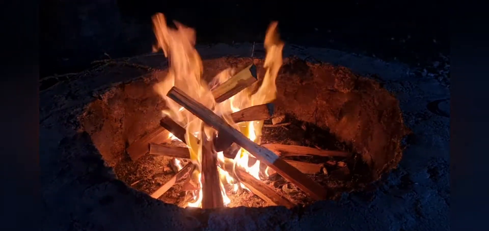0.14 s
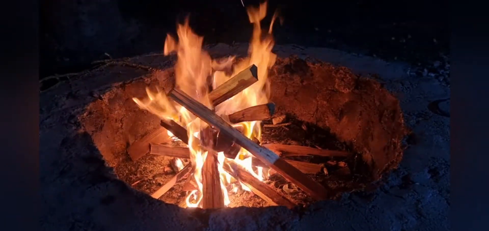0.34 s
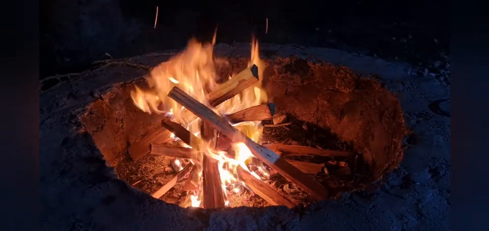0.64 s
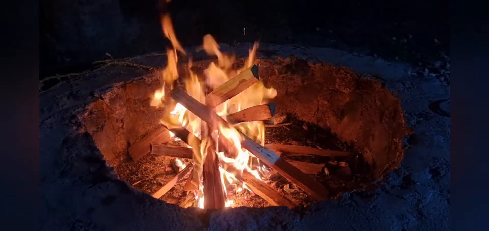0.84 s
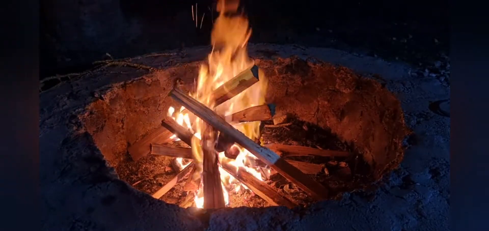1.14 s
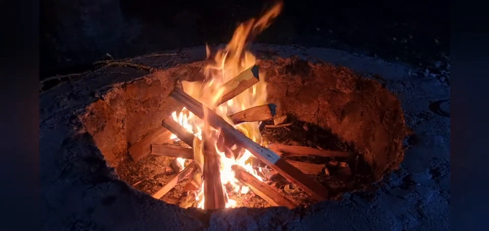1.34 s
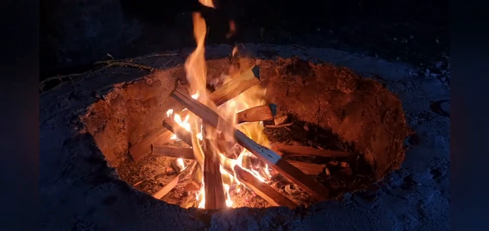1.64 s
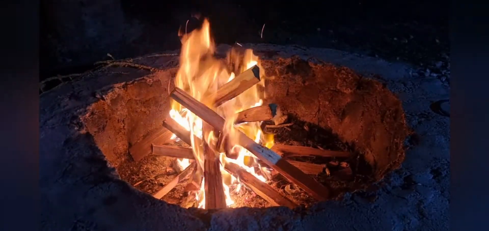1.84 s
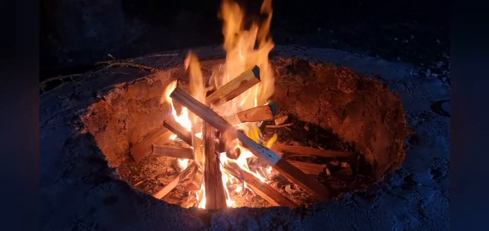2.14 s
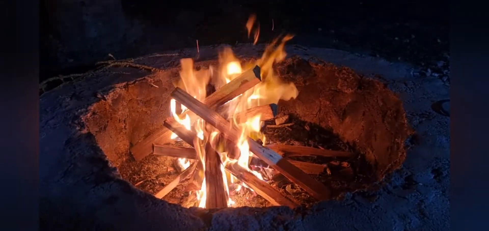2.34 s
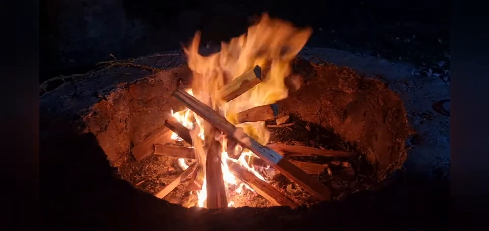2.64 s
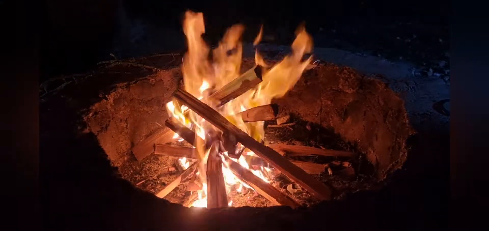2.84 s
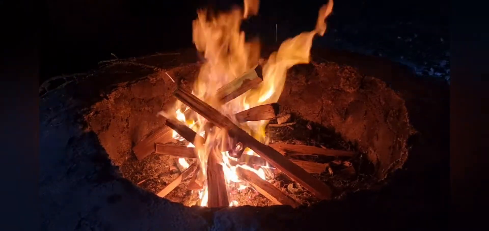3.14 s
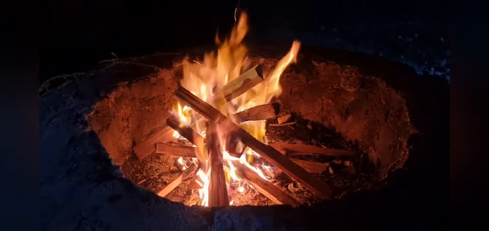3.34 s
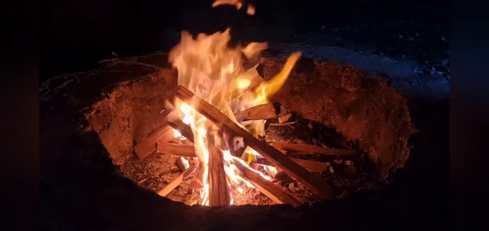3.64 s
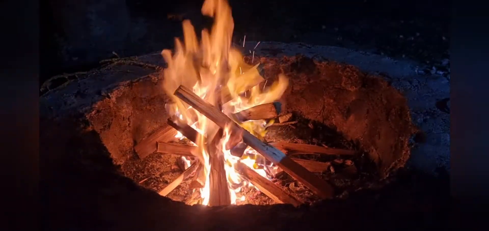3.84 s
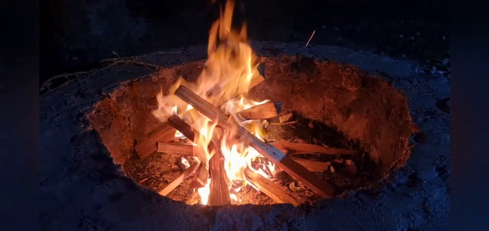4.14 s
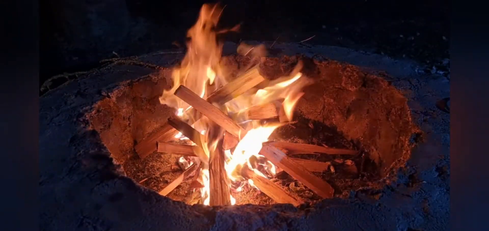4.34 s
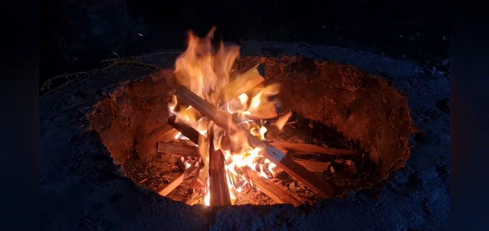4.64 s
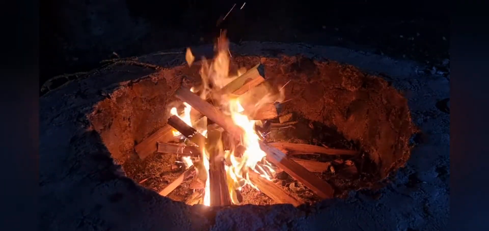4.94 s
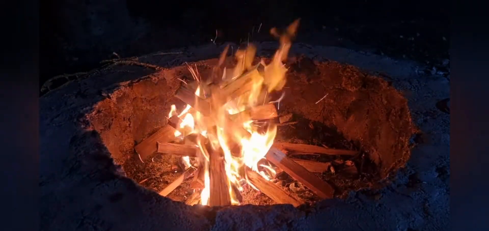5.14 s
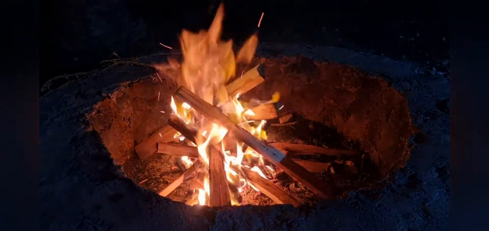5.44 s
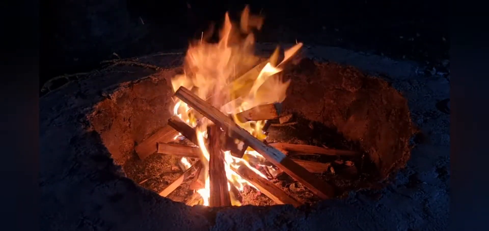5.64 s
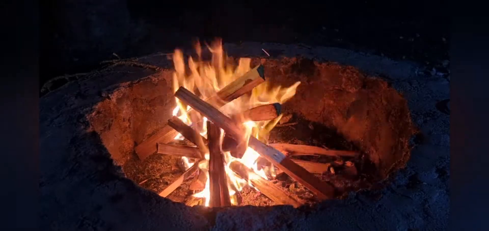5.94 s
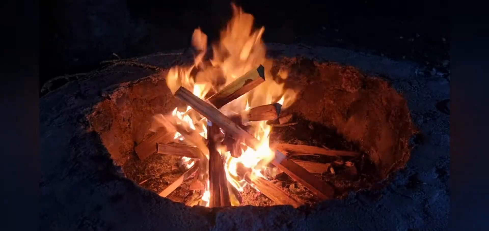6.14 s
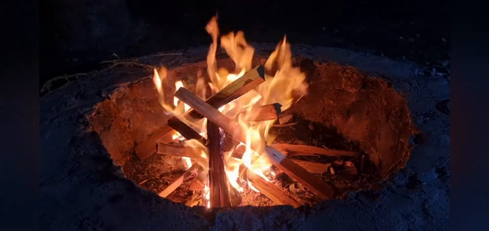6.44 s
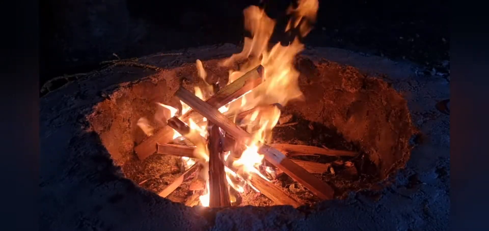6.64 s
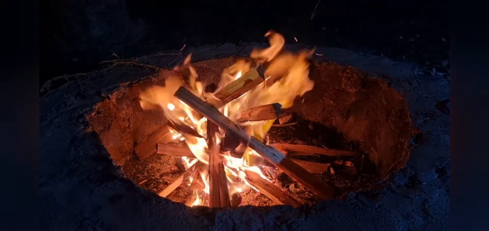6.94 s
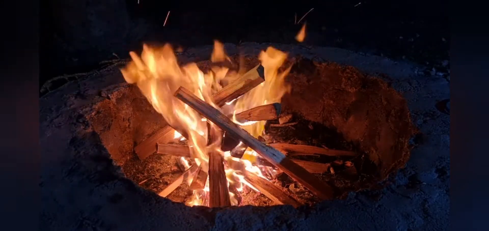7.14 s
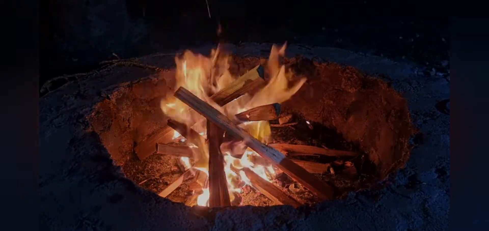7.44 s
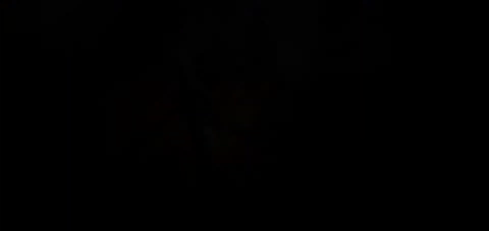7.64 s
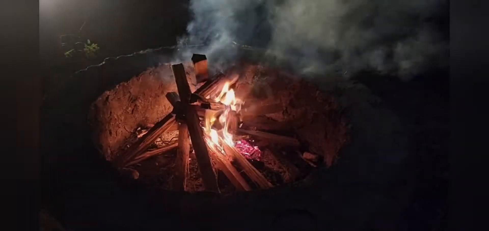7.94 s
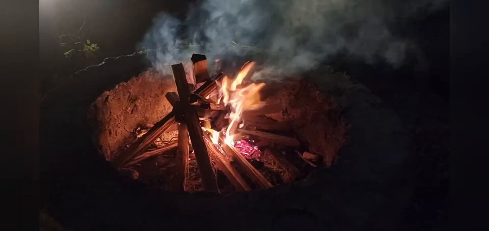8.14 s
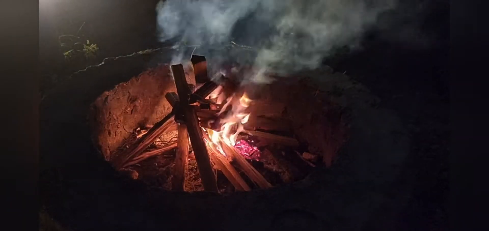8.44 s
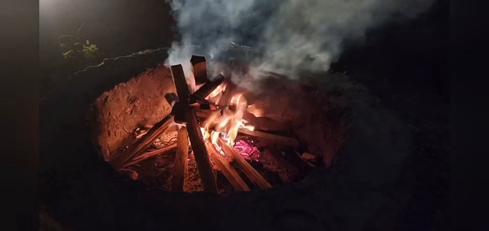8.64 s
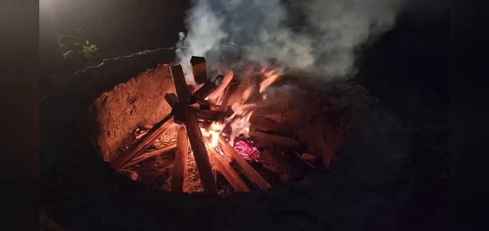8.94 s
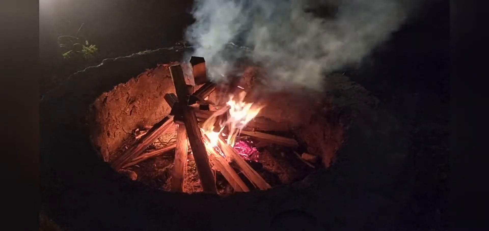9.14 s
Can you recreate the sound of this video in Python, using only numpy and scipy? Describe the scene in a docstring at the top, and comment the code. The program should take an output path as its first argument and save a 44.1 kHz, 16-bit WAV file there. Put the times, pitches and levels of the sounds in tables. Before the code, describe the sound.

Logs burn in an open pit: unsteady low rumble with short swells, faint high hiss, tiny random crackles, brittle woody snaps and brief crumbling charcoal. Bright insects trill and rasp continuously all round, leaning slightly left, over faint open air and a distant low hum. The pit wall gives the pops a very short echo. Late on, the whole sound fades down and up again; the fire is lower, with a few last pops.

```python
"""Flames flutter and rumble in an earthen pit at night, steam hisses from the wood, insects sing all round.
Flames, steam and open air are shaped noise; a wavering sine hums low. Crickets and katydids are noise bands
pulsed by wing strokes, and lone insects are thin wavering tones. Sap pockets pop and charcoal crumbles:
ringing noise bursts, the pops with damped modes added, all echoed by the pit wall.
The sound fades out and in again on the same fire burning lower, with other insects leading."""
import sys
import numpy as np
from scipy import signal
from scipy.fft import rfft, irfft, next_fast_len
from scipy.io import wavfile
from scipy.ndimage import uniform_filter1d, map_coordinates

SR = 44100
rng = np.random.default_rng(int(sys.argv[2]) if len(sys.argv) > 2 else 0)


def unload_wav(signal):
    """Save mono or channel-first audio to the path in sys.argv[1] as 16-bit WAV at rate SR, clipped to [-1, 1]."""
    wavfile.write(
        sys.argv[1],
        SR,
        np.round(np.clip(np.atleast_2d(signal).T, -1, 1) * 32767).astype(np.int16),
    )


N = 410130

# Rumble of the full fire, before flares: (time [s], level [dB])
DRAUGHT_DB = [(0, -52), (1.3, -49), (3.5, -46), (4.5, -51), (5.5, -47), (6.3, -53), (7.2, -51)]
# Flames flaring up: (time [s], length [s], rumble change [dB], flutter change [dB])
FLARES = [(2.21, 0.11, 6, 1.5), (5.083, .2, 5.5, 0), (5.344, 0.021, 0, 11), (5.82, 0.23, 7.5, -0.5)]
# Relative spectrum of the flames: (frequency [Hz], density [dB per Hz])
FLAME_SPECTRUM = [(13, -28), (22, -17), (54, -3), (75, 0), (173, -7), (258, -25.5), (400, -38), (520, -69),
                  (880, -120)]
# Relative spectrum of the steam: (frequency [Hz], density [dB per Hz])
STEAM_SPECTRUM = [(8000, -34), (10000, -15), (11200, -2.5), (12400, 5), (15600, 6), (16000, -4)]
# Insect choirs; the crickets sing lower than the katydids: (song [Hz], width scale [Hz],
# wing strokes [1/s], stroke depth [-], level before the fade's low point [dB], level after it [dB],
# left-right [dB])
CRICKETS = [(2681, 81, 11, 0.3, -58, -58, -4), (2357, 340, 20, 0.4, -62, -62.5, 0)]
# Same columns; the last two rows also take the swell
KATYDIDS = [(4140, 258, 29, 0.14, -53.5, -51, -5), (4810, 750, 100, 0.35, -59.5, -52.5, -7.5),
            (5294, 530, 69, 0.13, -50, -47.5, -3.5), (6694, 890, 23, 0.22, -47.5, -50.5, -3.5),
            (7450, 1230, 99, 0.29, -50.5, -53.5, 0)]
# Swell of the two highest katydid choirs: (time [s], gain [dB])
SWELL_DB = [(0, -.5), (1.5, 0), (3, 1), (4.5, 1), (5.5, 2.5), (6.7, 2), (7.3, 0.5), (9.3, 2)]
# Lone insects holding one thin note: (frequency [Hz], relative level [dB])
WHINES = [(4412, -66.5), (4485, -63), (7130, -76), (7950, -70.5)]
# Relative spectrum of the open air: (frequency [Hz], density [dB per Hz])
AIR_SPECTRUM = [(150, 7), (300, 0.5), (550, 3), (830, -5.5), (1050, -2), (1400, -7), (1600, -4.5),
                (1900, -8.5), (3100, -2.5), (3500, 1.5), (8500, -1), (10000, -5.5), (16000, -24)]
# Bursting sap pockets: (time [s], thud [dB], knock [dB], snap [dB], spit [dB], knock [Hz], snap [Hz],
# base t60 [s], left-right [dB]); noise bursts scale the base t60, damped modes have fixed decays
POPS = [(0.5416, -43.5, -37, -45, -60, 1370, 3270, 0.011, -1.5),
        (0.811, -39, -35.5, -24.5, -23.5, 1870, 4560, 0.0073, -4.5),
        (0.989, -50, -44.5, -39.5, -39, 1590, 4800, .013, 0),
        (2.086, -65, -58, -50, -40, 2090, 6240, .01, 13),
        (2.295, -45.5, -33, -29.5, -40, 1850, 6740, 0.0067, -2.5),
        (2.6317, -67, -58, -46, -42.5, 1690, 6500, 0.022, -4),
        (3.5175, -51, -40, -31, -41, 1160, 4760, 0.019, -1),
        (3.5554, -36, -34.5, -21, -22.5, 2000, 4170, .008, -6),
        (3.57, -52, -56, -36, -31.5, 1420, 3340, .09, -18.5),
        (3.589, -63, -58, -39, -41, 1370, 6300, .027, 4),
        (5.7415, -60, -56, -40.5, -38, 1480, 4300, .016, 2),
        (6.6353, -54, -31, -28, -39, 1330, 3570, .0065, -1.5),
        (6.969, -61, -57, -49, -38, 1980, 5470, .016, -1.5),
        (6.992, -58, -64, -41, -37, 1480, 6460, .02, -3),
        (8.251, -53.5, -54, -41.5, -44, 1080, 5120, .016, -3),
        (8.6398, -44, -37, -32, -25.5, 850, 3220, .01, -0.5)]
# Charred wood crumbling: (time [s], length [s], level [dB], pitch [Hz], left-right [dB])
CRUMBLES = [(1.77, 0.066, -55.5, 1850, 5), (2.48, 0.035, -62, 1560, 0), (3.359, 0.041, -56, 2110, 6),
            (7.234, .07, -60, 684, -8.5), (8.995, 0.0087, -53, 1950, -4)]
# Fade of the whole sound; row 2 is its low point: (time [s], gain [-])
FADE = [(0, 1), (7.2, 0.99), (7.665, 0.0055), (8.13, 1), (9.3, 1)]

FLUTTER_DB, FLUTTER_FOLLOWS = -52, 0.38  # share of the draught's dB swing that the tongues of flame take
LOW_RUMBLE_DB, LOW_FLUTTER_DB = -57, -62  # the fire burning lower
HUM_WAVER_DB = 2.5
POP_LEAD_MS = 0.14  # pops reach the left channel this much before the right
HOLLOW_HZ, HOLLOW_WIDTH_HZ, HOLLOW_DB = 9800, 1140, -5.5  # the pops' sound dips around 10 kHz
TICKS_PER_S, TICK_WIDTH_HZ, TICK_T60_S = 200, 740, 0.02
TOP_HZ = 15850


def amp(db):
    """Decibels to gain."""
    return 10 ** (np.asarray(db) / 20)


def unit(x):
    """Scale to rms 1."""
    return x / np.sqrt(np.mean(x ** 2) + 1e-20)


def sized(x):
    """Scale to the energy of 5 ms at rms 1."""
    return unit(x) * np.sqrt(0.005 * SR / x.shape[-1])


def curve(rows):
    """Interpolate (time [s], value) rows to one value per sample."""
    return np.interp(np.arange(N) / SR, *np.transpose(rows))


def change(first, later):
    """A value that steps at the low point of the fade."""
    return np.where(np.arange(N) / SR < FADE[2][0], first, later)


def wobble(rate_hz):
    """A smooth random curve through rate_hz normal knots a second."""
    knots = rng.standard_normal(int(N * rate_hz / SR) + 4)
    coarse = np.arange(0, N + 64, 64)
    smooth = map_coordinates(knots, [coarse * rate_hz / SR])
    return np.interp(np.arange(N), coarse, smooth)


def filtered(x, response):
    """Multiply the spectrum of x by a response of frequency."""
    n = x.shape[-1]
    m = next_fast_len(n + 4096)
    spectrum = rfft(x, m) * response(np.fft.rfftfreq(m, 1 / SR))
    return irfft(spectrum, m)[..., :n]


def colour(points):
    """The response through (Hz, dB) points on a log frequency axis."""
    f, db = np.transpose(points)
    return lambda hz: amp(np.interp(np.log(hz + 1), np.log(f), db, left=-120, right=-120))


def pan(db):
    """Left and right gains of mean power 1."""
    return unit(amp([[db / 2], [-db / 2]]))


def lead(x, ms):
    """Let the left channel run ahead of the right by ms."""
    delays_s = np.array([[max(-ms, 0)], [max(ms, 0)]]) / 1000
    return filtered(x, lambda hz: np.exp(-2j * np.pi * hz * delays_s))


def pair(alike, size=N):
    """Stereo white noise; alike is the power share common to both sides."""
    common, *own = rng.standard_normal((3, size))
    alike = np.clip(alike, 0, 1)
    return np.sqrt(alike) * common + np.sqrt(1 - alike) * np.array(own)


def add(track, time_s, sound):
    """Mix a sound into a track at time_s."""
    part = track[:, round(time_s * SR):][:, :sound.shape[1]]
    part += sound[:, :part.shape[1]]


def flames(puff_db=1.0, sway_db=1.5, split_hz=95):
    """Rising gas rumbles with the draught, tongues of flame flutter above it; flares change both levels."""
    t = np.arange(N) / SR
    draught_db = curve(DRAUGHT_DB)
    follow_db = FLUTTER_FOLLOWS * (draught_db - draught_db.mean())
    deep_db = change(draught_db, LOW_RUMBLE_DB)
    flutter_db = change(FLUTTER_DB + follow_db, LOW_FLUTTER_DB)
    for time_s, length_s, deep_change_db, flutter_change_db in FLARES:
        swell = np.exp(-(2 * (t - time_s) / length_s) ** 2)
        deep_db = deep_db + deep_change_db * swell
        flutter_db = flutter_db + flutter_change_db * swell

    def low(hz):
        """Power share of the deep rumble."""
        return 1 / (1 + (hz / split_hz) ** 8)

    def roar(share):
        """Unsteady flame noise in one share of the spectrum."""
        noise = filtered(pair(0.95), lambda hz: colour(FLAME_SPECTRUM)(hz) * np.sqrt(share(hz)))
        return unit(noise * amp(puff_db * wobble(15) + sway_db * wobble(6)))

    rumble = roar(low) * amp(deep_db)
    flutter = roar(lambda hz: 1 - low(hz)) * amp(flutter_db)
    return lead(rumble + flutter, 0.1) * pan(-1.4)


def steam(flicker_db=1.2):
    """Damp wood hisses as it heats: bright noise with a slight flicker."""
    hiss = unit(filtered(pair(0.17), colour(STEAM_SPECTRUM)))
    level_db = change(-57.0, -58.0) + flicker_db * wobble(25) + 0.26 * wobble(3.9)
    return hiss * amp(level_db) * pan(-1.3)


def choir(row, waver_db, count=2):
    """Singers stroke their wings at their own pace; distance blurs each song into a narrow band."""
    song_hz, width_hz, strokes_hz, depth, first_db, later_db, side_db = row
    effort = 0
    for _ in range(count):
        pace_hz = strokes_hz * (1 + 0.049 * rng.standard_normal() + 0.0696 * wobble(4))
        cycles = np.cumsum(pace_hz) / SR + rng.random()
        effort = effort + np.exp(depth * np.cos(2 * np.pi * cycles))
    wing = lambda hz: (1 + ((hz - song_hz) / width_hz) ** 2 * 1.23) ** -1.5
    song = unit(filtered(rng.standard_normal((2, N)) * effort, wing))
    return song * amp(change(first_db, later_db) + waver_db * wobble(4)) * pan(side_db)


def whines(waver_hz=9):
    """Single far insects sing nearly pure, slightly wavering notes until the fade's low point."""
    notes = np.zeros(N)
    for hz, db in WHINES:
        phase = 2 * np.pi * np.cumsum(hz + waver_hz * wobble(30)) / SR
        notes += amp(db + 2.8 * wobble(6.8)) * np.sin(phase)
    return notes * change(0.95, 0) * pan(-9.5)


def insects():
    """Crickets trill low; katydids rasp higher, and the two highest choirs swell together."""
    crickets = sum(choir(row, waver_db=0.8) for row in CRICKETS)
    rasps = [choir(row, waver_db=0.82) for row in KATYDIDS]
    highest = sum(rasps[3:]) * amp(curve(SWELL_DB))
    return crickets + sum(rasps[:3]) + highest + whines()


def night(hum_hz=68, hum_db=-57, patchy_db=3.0):
    """Faint open-air noise shifts in small time-frequency patches; a low wavering hum comes from far away."""
    z = signal.stft(pair(0.13), nperseg=512)[2]
    patches = uniform_filter1d(rng.standard_normal(z.shape[1:]), size=3, axis=0)  # across frequency
    patches = uniform_filter1d(patches, size=14, axis=1)  # along time
    drifting = signal.istft(z * amp(patchy_db * unit(patches)), nperseg=512)[1][:, :N]
    air = unit(filtered(drifting, colour(AIR_SPECTRUM))) * amp(-56.0) * pan(-0.87)
    hum_phase = 2 * np.pi * np.cumsum(hum_hz + 1.2 * wobble(4.5)) / SR
    hum = unit(np.sin(hum_phase) * amp(HUM_WAVER_DB * wobble(4.3)))
    return air + amp(hum_db) * hum


def burst(hz, width_hz, t60_s, alike, rise_s=0.00076):
    """A fracture's noise swells quickly and rings a resonance (two passes, each width_hz wide)."""
    t = np.arange(SR // 12) / SR
    decay = amp(-60 * t / max(t60_s, 0.003))
    rub = pair(alike, size=len(t)) * decay * (1 - np.exp(-t / rise_s))
    b, a = signal.iirpeak(min(hz, SR * 0.45), hz / width_hz, SR)
    return sized(signal.lfilter(b, a, signal.lfilter(b, a, rub)))


def mode(hz, t60_s):
    """One damped mode of a stick, struck once."""
    t = np.arange(SR // 12) / SR
    return sized(np.sin(2 * np.pi * hz * t) * amp(-60 * t / t60_s))


def crackle(rate_hz=22, level_db=-63, spread_db=2.5):
    """Tiny splits in the embers tick at random, a few louder than the rest."""
    out = np.zeros((2, N))
    for when, size, pitch, side in rng.random((int(rate_hz * N / SR), 4)):
        woody = burst(500 + 1500 * pitch, 1800, 0.005, alike=0.14) * amp(-9)
        bright = burst(8000 + 7000 * pitch, 6000, 0.0056, alike=0.33)
        gain = amp(level_db - spread_db * np.log(1.01 - size))
        add(out, when * N / SR, gain * (woody + bright) * pan(8 * side - 5))
    return out


def pops():
    """Each burst pushes the air, knocks the stick, snaps its fibres and spits a jet of steam."""
    out = np.zeros((2, N))
    for time_s, thud_db, knock_db, snap_db, spit_db, knock_hz, snap_hz, t60_s, side_db in POPS:
        push = burst(470, 590, t60_s * 1.16, alike=1.0)
        thud = amp(thud_db) * (mode(330, 0.014) * 0.57 + push)

        stick = burst(knock_hz, 2130, t60_s * 1.64, alike=0.81) * 1.03
        knock = amp(knock_db) * (stick - mode(knock_hz, 0.0084) * 0.3)

        fibres = burst(snap_hz, 1400, t60_s, alike=0.13) * 0.86
        fibres = fibres + burst(4830, 6600, t60_s * 0.99, alike=0.49)
        snap = amp(snap_db) * (mode(snap_hz, 0.011) * 0.56 + fibres)

        puff = burst(14300, 4600, t60_s * 0.5, alike=0.19, rise_s=0.00011) * 0.88
        sizzle = burst(13200, 4500, t60_s * 2.2, alike=0.38) * 0.7
        spit = amp(spit_db) * (puff + sizzle)
        add(out, time_s, (thud + knock + snap + spit) * pan(side_db))
    hollow = lambda hz: amp(HOLLOW_DB * np.exp(-((hz - HOLLOW_HZ) / HOLLOW_WIDTH_HZ) ** 2))
    return lead(filtered(out, hollow), POP_LEAD_MS)


def crumbles(scatter_db=2, splinter_db=1):
    """Charcoal gives way in a short run of uneven woody ticks, each with a bright splinter."""
    out = np.zeros((2, N))
    for start_s, length_s, level_db, hz, side_db in CRUMBLES:
        count = max(1, round(length_s * TICKS_PER_S))
        for k in range(count):
            woody = burst(hz, TICK_WIDTH_HZ, TICK_T60_S, alike=0.56)
            splinter = amp(splinter_db) * burst(4300, 5000, 0.015, alike=0.3)
            time_s = start_s + length_s * (k + rng.random()) / count
            gain = amp(level_db + scatter_db * rng.standard_normal())
            add(out, time_s, gain * (woody + splinter) * pan(side_db))
    return out


def pit(x, wall_db=-13, air_db=-25, wall_t60_s=0.067, air_t60_s=0.054):
    """The pit's earth wall answers at once; the yard adds a faint tail; both are decaying noise."""
    t = np.arange(SR // 3) / SR

    def dying(t60_s):
        """Decaying noise of unit energy, silent for the first 2 ms."""
        noise = rng.standard_normal((2, len(t)))
        return unit(noise * amp(-60 * t / t60_s) * (t > 0.002)) / np.sqrt(len(t))

    echo = amp(wall_db) * dying(wall_t60_s) + amp(air_db) * dying(air_t60_s)
    return x + signal.fftconvolve(x, echo, axes=1)[:, :N]


def scene():
    """The fire close by, the insects all round."""
    snapping = pit(pops() + crumbles() + crackle())
    return flames() + steam() + insects() + night() + snapping


def record(dry):
    """A straight fade down and up, and the band limit."""
    return filtered(dry * curve(FADE), lambda hz: hz < TOP_HZ)


dry = scene()
out = record(dry)
unload_wav(out)
```